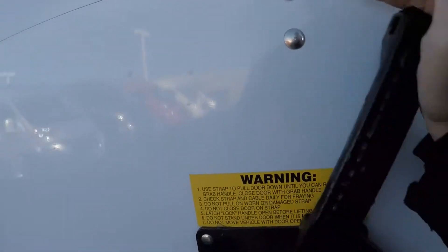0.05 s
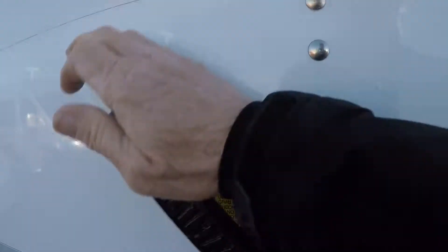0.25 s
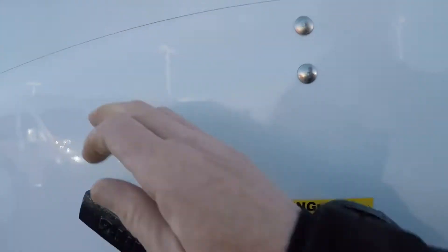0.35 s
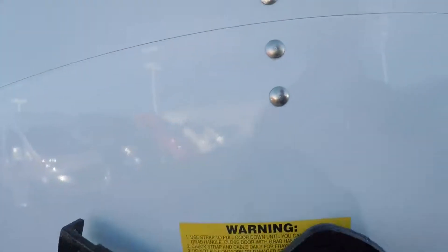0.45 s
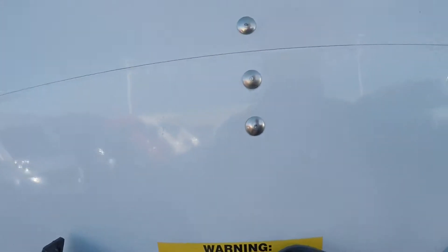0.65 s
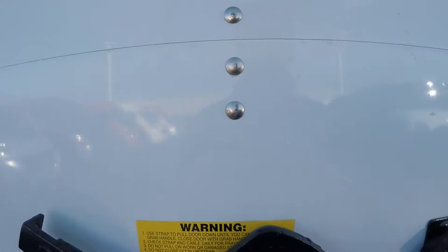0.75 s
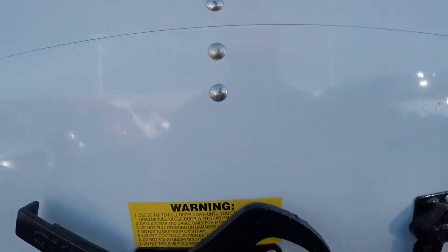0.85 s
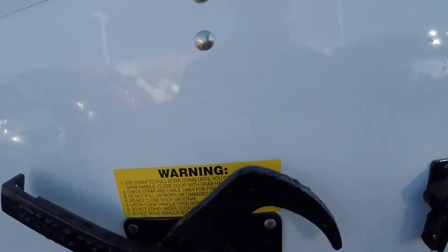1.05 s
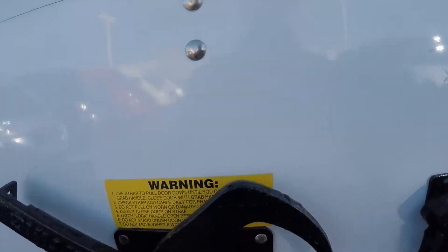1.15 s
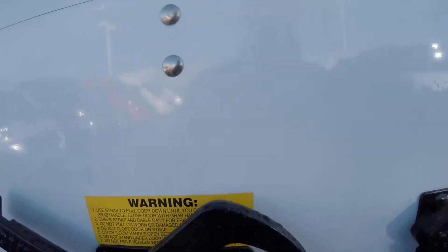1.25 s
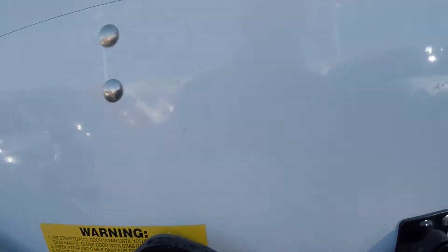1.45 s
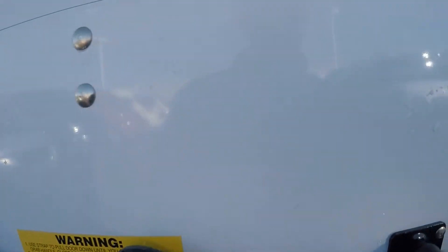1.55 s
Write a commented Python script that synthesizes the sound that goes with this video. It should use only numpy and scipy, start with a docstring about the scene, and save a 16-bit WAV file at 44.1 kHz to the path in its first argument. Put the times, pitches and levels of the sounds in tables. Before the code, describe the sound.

A truck door's steel lever clanks twice into place, then clothing rustles softly.

```python
"""Latching a truck's roll-up door

The catch clacks, then the steel lever swings over and slams twice into its stop, shaking the
door panels and the hollow cargo box behind them. A dry, crackling rustle follows, like a jacket
sleeve, with a few small ticks. Underneath are fading distant traffic and wind on the microphone."""
import sys
import numpy as np
from scipy import signal
from scipy.fft import rfft, irfft
from scipy.io import wavfile

SR = 44100
rng = np.random.default_rng(int(sys.argv[2]) if len(sys.argv) > 2 else 0)


def generate_wav(signal):
    """Clip the signal to [-1, 1] and save it as 16-bit WAV at the path in sys.argv[1]."""
    frames = np.transpose(np.atleast_2d(signal))
    scaled = np.clip(frames, -1, 1) * 32767
    pcm = np.round(scaled).astype(np.int16)
    wavfile.write(sys.argv[1], SR, pcm)


N = 70560
STEEL_RISE_S = 0.00079  # how fast struck steel starts to ring


def amp(db):
    """Turns decibels into a gain."""
    return 10 ** (np.asarray(db) / 20)


def unit(x):
    """Scales a sound to an average (rms) level of 1."""
    return x / np.sqrt(np.mean(x ** 2) + 1e-20)


def read(points, hz):
    """Looks up a table by frequency, on a log scale."""
    f, value = np.transpose(points)
    return np.interp(np.log(hz + 1), np.log(f + 1), value)


def add(mix, s, sound):
    """Adds a sound at s seconds."""
    part = mix[max(round(s * SR), 0):][:len(sound)]
    part += sound[:len(part)]


def colour(x, spectrum):
    """Gives a sound the shape of a spectrum, keeping attacks sharp."""
    size = 4096
    log_gain = np.log(amp(read(spectrum, abs(np.fft.fftfreq(size, 1 / SR)))))
    taps = np.fft.ifft(np.exp(np.conj(signal.hilbert(log_gain)))).real[:size // 2]
    return signal.fftconvolve(x, taps / np.linalg.norm(taps))[:len(x)]


def dying(t, t60):
    """A fade that falls by 60 dB in t60 seconds."""
    return np.exp(-np.log(1000) * t / np.maximum(t60, 1e-4))


def ring(modes, rise_s):
    """A struck part rings with a few clear, fading tones (its modes)."""
    t = np.arange(SR // 2) / SR
    tones = sum(amp(db) * dying(t, t60) * np.sin(2 * np.pi * hz * t) for hz, db, t60 in modes)
    return (1 - np.exp(-t / rise_s)) * tones


def clang(spectrum, decay, tilt_db, rise_s, rise_cycles=0, count=27):
    """Countless crowded tones: third-octave bands of noise, each fading at its own speed."""
    size = 32768
    t, f = np.arange(size) / SR, np.fft.rfftfreq(size, 1 / SR)
    hz = np.geomspace(40, 16000, count)[:, None]
    window = np.maximum(1 - abs(np.log((f + 1) / hz)) / np.log(hz[1] / hz[0]), 0)
    attack = 1 - np.exp(-t / (rise_s + rise_cycles / hz))  # rise_cycles slows the low bands most
    shape = attack * dying(t, read(decay, hz))
    bands = irfft(window * rfft(rng.standard_normal(size))) * shape
    bands *= np.linalg.norm(shape, axis=1, keepdims=True) / np.linalg.norm(bands, axis=1, keepdims=True)
    octaves = np.log2(hz / 1500)
    return (bands * amp(read(spectrum, hz) + tilt_db * octaves)).sum(0)


def wash(spectrum, levels):
    """Filtered noise that slowly swells and fades."""
    noise = colour(rng.standard_normal(N + SR), spectrum)[SR:]
    level_db = np.interp(np.arange(N) / SR, *np.transpose(levels))
    return unit(noise) * amp(level_db)


def traffic():
    """Distant traffic blurs into a fading rush."""
    spectrum = [(100, 0), (300, -14), (480, -9.5), (750, 3.5), (1150, -1.5), (1700, 2.5), (2400, -2.5),
                (3200, -15.5), (4500, -22.5), (8000, -38), (15000, -63)]  # tone of the rush: f/Hz, relative level/dB
    levels = [(0, -37), (.25, -41), (.6, -37.5), (.8, -40), (.95, -45.5), (1.15, -47), (1.32, -52),
              (1.6, -53)]  # its loudness: t/s, level/dB
    return wash(spectrum, levels)


def wind():
    """Wind and handling rumble on the microphone."""
    spectrum = [(15, -5.5), (30, 2.5), (60, -7), (120, -5.5), (200, -20.5), (400, -28.5), (2000, -51.5)]  # tone of the rumble: f/Hz, relative level/dB
    levels = [(0, -36), (.2, -39), (.3, -36), (.6, -41), (.85, -45), (1.15, -39), (1.6, -39)]  # its loudness: t/s, level/dB
    return wash(spectrum, levels)


def lever_slide():
    """The lever rubs as the hand slides it round."""
    spectrum = [(100, -10.5), (250, 10.5), (500, -4), (1000, -15), (2500, -7), (4200, -13.5), (8000, -27.5),
                (15000, -43)]  # tone of the rubbing: f/Hz, relative level/dB
    levels = [(0, -40), (.1, -43), (0.218, -40), (.27, -41.5), (.36, -41), (.5, -63)]  # its loudness: t/s, level/dB
    return wash(spectrum, levels)


def latch():
    """The steel catch, hook and lever knock together and ring."""
    pings = [(0, -55), (0.1343, -47.5)]  # thin rings of the catch: t/s, level/dB
    # light knocks: t/s, level/dB, treble tilt/(dB per octave), catch ring/dB, hook ring/dB
    clacks = [(0.1323, -1, 1.5, 2.5, -28), (0.1350, 2, 0, -22, -4), (0.2815, -5.5, -1, -10, -16),
              (0.3238, -3, 0, -35, 3), (0.330, -6.5, -2, -36, -30), (0.342, -5.5, -1.5, -35, -29),
              (0.3479, -6.5, -1.5, -35, -20), (0.352, -17, 3.5, -26, -38), (0.4091, -8.5, 2, -29, -39),
              (0.492, -10, -2, -23, -36)]
    steel_bands = [(60, -33.5), (150, -65), (300, -29), (600, -30), (950, -23.5), (1500, -26), (2200, -9),
                   (3000, -27), (4000, -23), (5500, -23), (7200, -29.5), (9500, -48.5), (15000, -49.5)]  # clang of the steel: f/Hz, level/dB
    steel_decay = [(100, 0.063), (400, 0.045), (1000, 0.047), (2200, 0.028), (5000, 0.012), (12000, 0.035)]  # how long it lasts: f/Hz, t60/s
    catch_modes = [(294, -23.5, 0.047), (455.8, -31.5, 0.28), (688, -17.5, 0.073), (956, 3.5, 0.0068),
                   (1050, -25, 0.046), (1218, -21.5, 0.073), (2090, -13, 0.016), (4113, -36, 0.11)]  # tones of the catch: f/Hz, level/dB, t60/s
    hook_modes = [(1764, -20, 0.047), (3460, -17.5, 0.023), (3854, -6, 0.015), (4020, -16, 0.033),
                  (4670, -20, 0.041), (4960, -17.5, 0.019), (7260, -18, 0.0086)]  # tones of the hook: f/Hz, level/dB, t60/s
    ping_hz, ping_t60, damped_s = 8175, 0.52, 0.23
    out = np.zeros(N)
    for s, db in pings:
        add(out, s, ring([(ping_hz, db, ping_t60)], STEEL_RISE_S))
    out *= dying(np.maximum(np.arange(N) / SR - damped_s, 0), t60=0.12)  # the hand stops the ping
    for s, db, tilt_db, catch_db, hook_db in clacks:
        add(out, s, amp(db) * clang(steel_bands, steel_decay, tilt_db, STEEL_RISE_S))
        add(out, s, amp(catch_db) * ring(catch_modes, STEEL_RISE_S))
        add(out, s, amp(hook_db) * ring(hook_modes, STEEL_RISE_S))
    return out


def door():
    """A hand bumps the door, then the lever hits its stop and bounces; panels boom, the box echoes."""
    # a soft bump of the hand on the door, then blows of the lever:
    # t/s, level/dB, treble tilt/(dB per octave), panel boom/dB, lever ring/dB
    hits = [(0.262, -38.5, -7, -23.5, -53), (0.3740, 1, 0.5, 2.5, 2), (0.3945, -15, -1, -11.5, -20),
            (0.4272, -2, -2, -15.5, -13), (0.431, -7, 2.5, -48, -5.5), (0.460, -18.5, -3.5, -12.5, -38),
            (0.4761, -17.5, -2, -23, -35)]
    skin_bands = [(40, -28.5), (110, -29), (260, -19), (450, -23), (700, -14.5), (1100, -17.5), (1500, -14),
                  (2200, -11.5), (3000, -19.5), (4000, -15), (5100, -26), (6500, -22), (9000, -37),
                  (15000, -38.5)]  # clang of the door's skin and fittings: f/Hz, level/dB
    skin_decay = [(60, 0.16), (250, 0.15), (600, 0.085), (2000, 0.068), (4500, 0.058), (12000, 0.045)]  # how long it lasts: f/Hz, t60/s
    box_bands = [(60, -47), (230, -35.5), (500, -34), (1000, -40), (2200, -28.5), (4000, -40.5),
                 (8000, -52.5), (15000, -73)]  # echo of the cargo box: f/Hz, level/dB
    box_decay = [(60, 0.63), (400, 0.43), (2000, 0.5), (5000, 0.31), (12000, 0.28)]  # how long it lasts: f/Hz, t60/s
    panel_modes = [(58.7, -14, 0.34), (72.8, -4, 0.12), (121, -12, 0.21), (166, -24, 0.53),
                   (231.7, -17, 0.41), (259, -10.5, 0.18), (295.8, -15.5, 0.19), (352.5, -22, 0.19),
                   (404, -20.5, 0.137), (560, -25, 0.14)]  # tones of the panels: f/Hz, level/dB, t60/s
    lever_modes = [(720, -25, 0.12), (1454, -11.5, 0.1), (1727, -20, 0.21), (2080, -25.5, 0.23),
                   (2306, -12.5, 0.084), (4190, -16.5, 0.039), (5096, -4, 0.019), (6750, -21, 0.03)]  # tones of the lever: f/Hz, level/dB, t60/s
    # tones of the latch spring: f/Hz, level/dB, t60/s
    spring_modes = [(8100, -56, 0.14), (9940, -30, 0.074), (11430, -48, 0.15), (13610, -42, 0.1)]
    out = np.zeros(N)
    for s, db, tilt_db, boom_db, lever_db in hits:
        skin = clang(skin_bands, skin_decay, tilt_db, rise_s=0.00022, rise_cycles=0.27)
        echo = clang(box_bands, box_decay, tilt_db=0, rise_s=0.0048)
        add(out, s, amp(db) * (skin + echo))
        add(out, s, amp(boom_db) * ring(panel_modes, rise_s=0.0049))
        add(out, s, amp(lever_db) * ring(lever_modes, STEEL_RISE_S))
    add(out, 0.431, ring(spring_modes, STEEL_RISE_S))  # the spring sings after the second big slam
    return out


def rustle():
    """Tiny slips of cloth swell with each stroke, dotted with sharp little clicks."""
    strokes = [(1, 0.032, -10.5), (1.05, 0.014, 0.5), (1.102, 0.019, -5), (1.209, 0.048, -6),
               (1.276, 0.0063, -5), (1.404, 0.036, -5), (1.457, 0.017, 0.5), (1.502, 0.0095, -4.5),
               (1.539, 0.017, -13), (1.574, 0.0068, 0.5), (1.597, 0.0089, 0.5)]  # moves of the cloth: middle t/s, half length/s, relative level/dB
    # sharp little clicks, from the cloth and from small hard parts touching: t/s, level/dB
    clicks = [(0.796, -40), (0.839, -37), (.879, -37.5), (.914, -33.5), (0.9948, -28), (1.012, -26),
              (1.041, -28), (1.0612, -22.5), (1.1973, -27.5), (1.209, -23), (1.257, -23), (1.2807, -24.5),
              (1.369, -32), (1.4185, -19.5), (1.469, -31), (1.4963, -30.5), (1.5668, -20.5), (1.5878, -26)]
    spectrum = [(200, -12.5), (700, -6), (1500, -5), (2200, -4.5), (3000, 1), (4800, 3.5), (7000, -5),
                (9000, -12), (11500, -24), (15500, -30)]  # tone of the rustle: f/Hz, relative level/dB
    slips_per_s, spread_db, rustle_db, click_rise_s = 7000, 3.2, -35, 0.0006
    t, short = np.arange(N) / SR, np.arange(SR // 25) / SR
    effort = np.sqrt(sum(amp(db) ** 2 * np.exp(-((t - s) / half) ** 2) for s, half, db in strokes))
    slipping = rng.random(N) < slips_per_s / SR
    slips = slipping * amp(spread_db * np.minimum(rng.exponential(1, N), 4.5))
    power = signal.fftconvolve(slips ** 2, dying(short, t60=0.004) ** 2)[:N]
    grains = np.sqrt(abs(power)) * rng.standard_normal(N)
    crackle = amp(rustle_db) * effort * unit(grains)
    click = (1 - np.exp(-short / click_rise_s)) * dying(short, t60=0.012)
    for s, db in clicks:
        add(crackle, s, amp(db) * click * rng.choice([-1, 1], len(short)))
    return colour(crackle, spectrum)


def ticks():
    """Small hard parts touch: each gives a short scrape around one rough pitch."""
    touches = [(.9943, -32, 1300, .028), (1.306, -36.5, 2970, 0.022), (1.424, -33, 2720, 0.022),
               (1.443, -35.5, 3020, 0.046), (1.5868, -20.5, 3310, 0.0088), (1.5952, -29, 3120, 0.014)]  # light contacts: t/s, level/dB, f/Hz, t60/s
    width_hz = 750
    out, t = np.zeros(N), np.arange(SR // 10) / SR
    for s, db, hz, t60 in touches:
        body = t * np.exp(-np.pi * width_hz * t) * np.sin(2 * np.pi * hz * t)
        fade = dying(t, t60)
        scrape = fade * signal.fftconvolve(rng.standard_normal(2 * len(t) - 1), body, "valid")
        add(out, s, amp(db) * scrape * np.linalg.norm(fade) / np.linalg.norm(scrape))
    return out


def scene():
    """Mixes all the sounds into one channel."""
    return (latch() + door() + rustle() + ticks() + traffic() + lever_slide() + wind())[None]


def record(dry):
    """The heavy blows overload and lose their peaks; then the highest treble is cut."""
    drive_db, hardness, cutoff_hz = -0.5, 9.4, 15800
    driven = dry * amp(drive_db)
    clipped = driven / (1 + abs(driven) ** hardness) ** (1 / hardness)
    lowpass = signal.firwin(255, cutoff_hz, window=("kaiser", 8), fs=SR)
    return signal.oaconvolve(clipped, lowpass[None], "same")


dry = scene()
out = record(dry)
generate_wav(out)
```